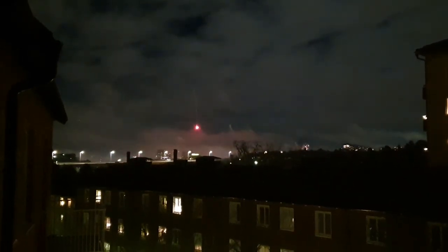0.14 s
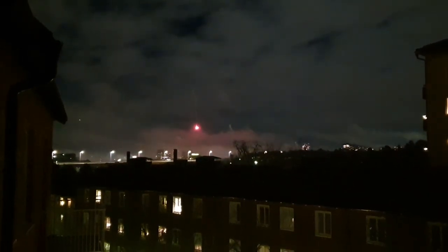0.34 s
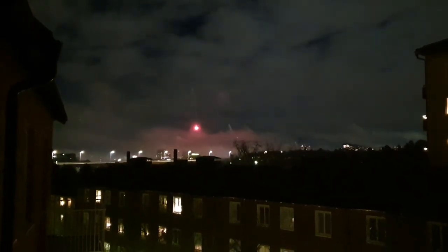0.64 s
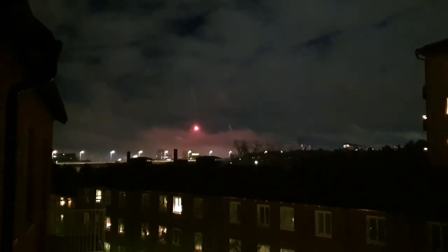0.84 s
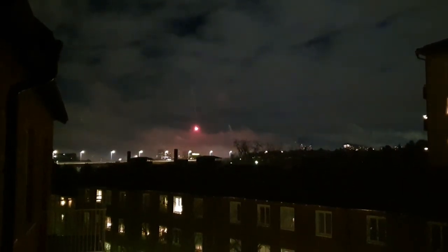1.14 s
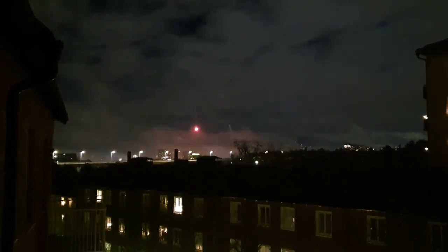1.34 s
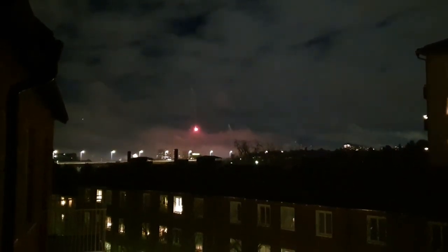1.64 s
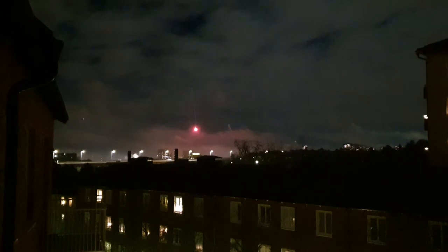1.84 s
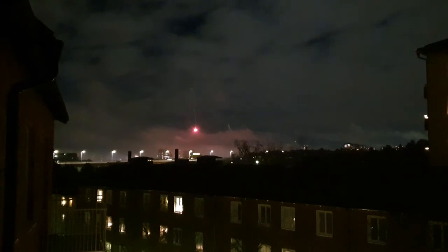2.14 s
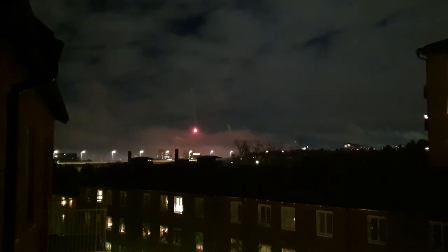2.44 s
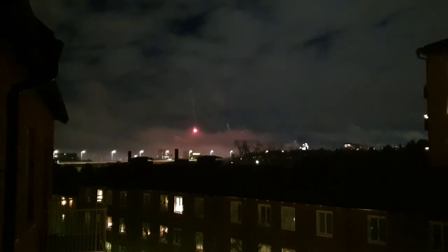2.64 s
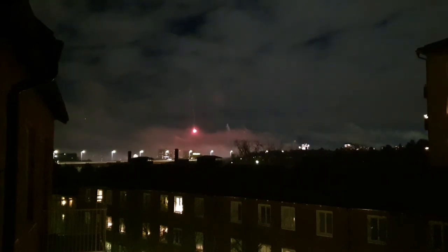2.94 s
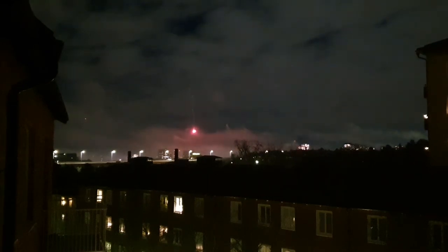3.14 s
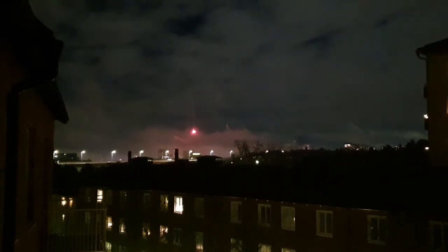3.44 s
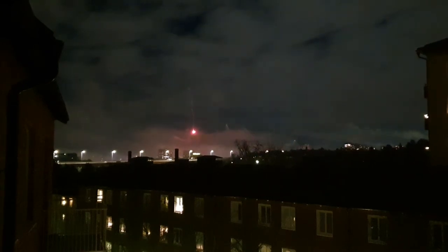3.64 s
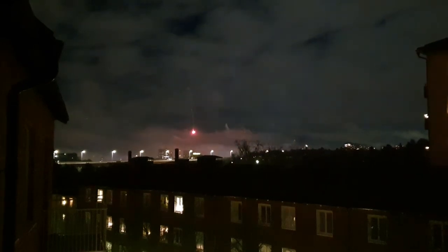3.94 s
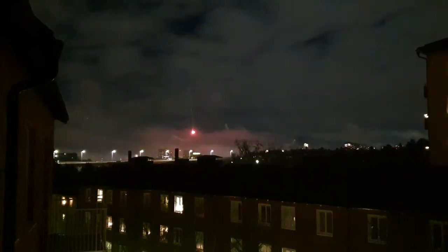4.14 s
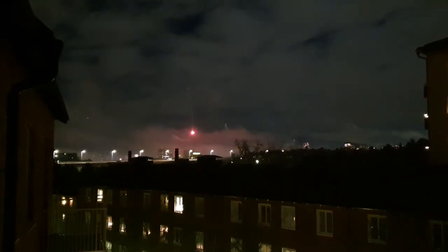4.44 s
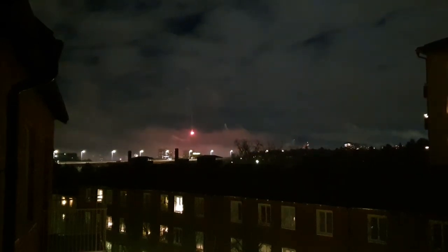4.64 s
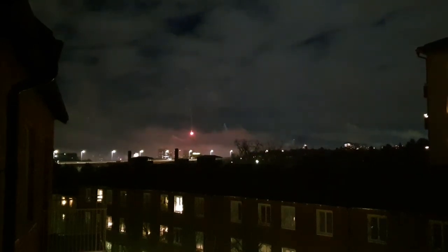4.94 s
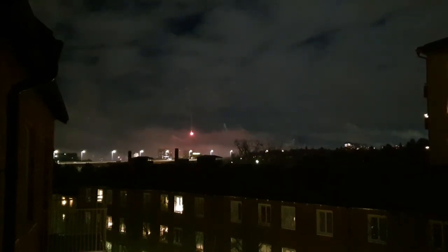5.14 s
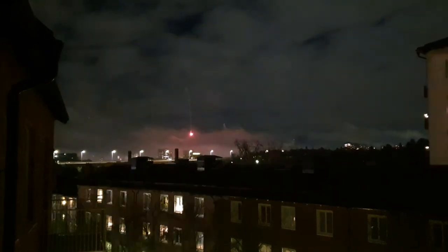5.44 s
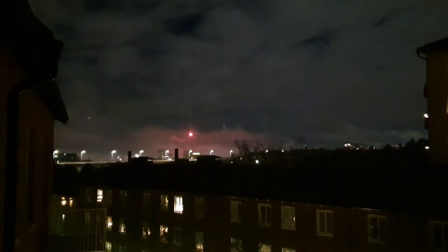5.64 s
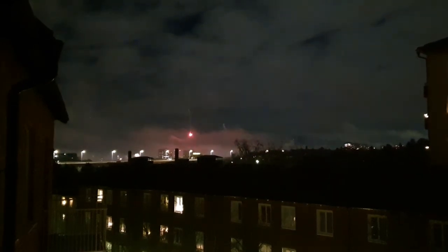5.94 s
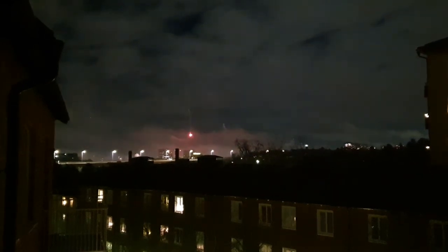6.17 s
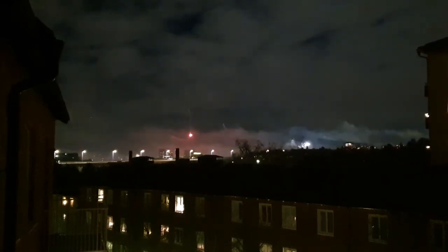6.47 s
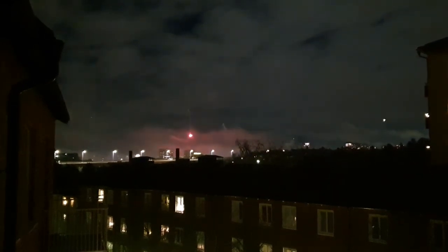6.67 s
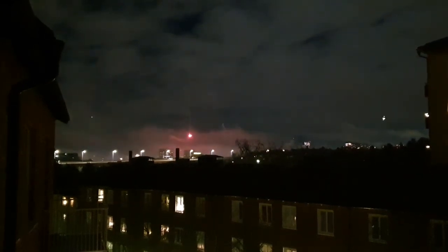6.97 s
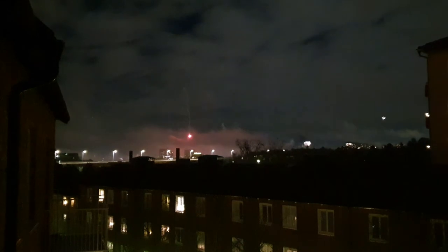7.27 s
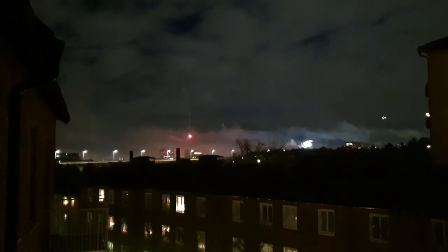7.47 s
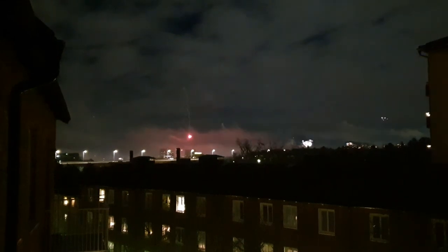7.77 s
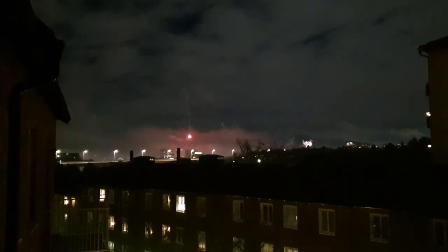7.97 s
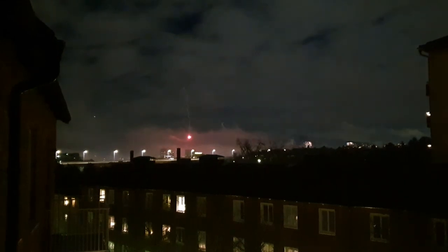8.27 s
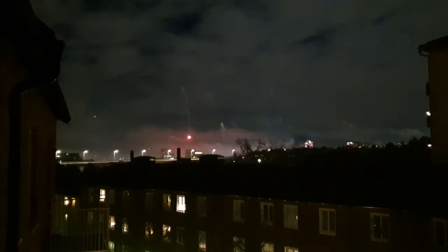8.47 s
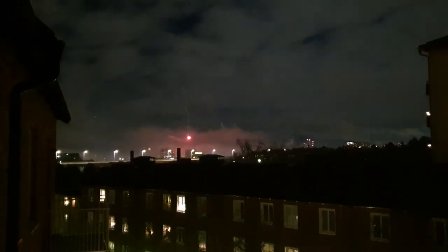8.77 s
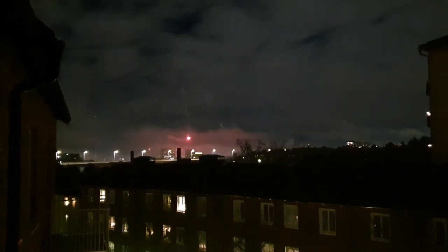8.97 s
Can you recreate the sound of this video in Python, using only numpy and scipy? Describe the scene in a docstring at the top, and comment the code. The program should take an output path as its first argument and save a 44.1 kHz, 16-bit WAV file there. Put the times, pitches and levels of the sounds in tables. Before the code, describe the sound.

Fireworks go off all over a town at night, heard in stereo from a balcony. Countless far pops merge into a low rumble, with dull single bangs arriving irregularly and bouncing off nearby walls. A nearer burst opens with a long, bright, crackling echo, and more follow. The two biggest rolls come in the second half, topped with sharp ticks, and a tight cluster of bangs lands at the end.

```python
"""Fireworks over a town at night, from a balcony, on a pair of microphones a hand apart.
From the start countless far pops merge into a rumble, and a near shell leaves a long bright roll between
the house fronts; for about a second the bass leans right. Single bangs keep arriving as dull pressure
pulses and come again off the walls nearby. The biggest rolls break near 6 s and 7.5 s, with ticks and
brief coloured echoes on top; a last tight cluster of bangs lands at 9 s."""
import sys
import numpy as np
from scipy import signal
from scipy.fft import rfft, irfft, next_fast_len
from scipy.io import wavfile
from scipy.ndimage import uniform_filter1d

SR = 44100
rng = np.random.default_rng(int(sys.argv[2]) if len(sys.argv) > 2 else 0)


def generate_wav(sig):
    """Save sig (samples, or channels by samples) to the path in sys.argv[1] as 16-bit PCM at SR."""
    pcm = np.round(np.clip(np.atleast_2d(sig).T, -1, 1) * 32767).astype(np.int16)
    wavfile.write(sys.argv[1], SR, pcm)


N = 401751
RIGHT_LAG_S = .0005  # sound from the far right reaches the left microphone this much later
SIDE_SCATTER_S = .0001  # typical lag of a report from nearly straight ahead
TOP_HZ = 15700  # upper edge of the sound


def bangs():
    """Each bang: blast pulse, what the air left of its sharp front, a thump off the house wall behind."""
    # bangs that stand out: t/s (mid-pulse), push/dB, pulse f/Hz, thump/dB, crack/dB, knock f/Hz
    reports = [(0.046, -10, 282, -23, -41, 900), (0.097, -11.5, 455, -16, -42, 2730),
               (0.571, -10.5, 558, -40, -46, 1270), (0.878, -17, 670, -38, -30.0, 1660),
               (1.133, -28, 390, -42, -40, 1950), (1.215, -12, 480, -43, -53.5, 900),
               (1.312, -13.5, 350, -37.5, -49, 2220), (1.351, -9, 511, -35, -32.5, 1800),
               (1.377, -10, 380, -41, -35.0, 2020), (1.409, -9, 358, -41, -32.5, 1190),
               (1.457, -6, 407, -12.5, -32, 1030), (1.616, -14, 314, -11, -59, 900),
               (1.782, -6.5, 466, -15.5, -36, 1190), (1.914, -23, 520, -26, -36, 1200),
               (2.005, -15, 450, -46, -34, 1110), (2.039, -12, 348, -28, -51, 1030),
               (2.076, -6.5, 487, -37, -41, 1340), (2.131, -18, 620, -45, -27.5, 1110),
               (2.143, -4, 423, -47, -28.5, 1460), (2.202, -5, 520, -34, -55, 4430),
               (2.219, -2.5, 394, -30, -25, 1790), (2.352, -9, 300, -43, -53, 900),
               (2.37, -12, 447, -37, -32, 1040), (2.482, -8.5, 434, -39, -46, 900),
               (2.51, -8.5, 370, -43, -53, 900), (2.57, -9, 450, -48, -42, 900),
               (2.765, -13.5, 378, -37, -29, 1110), (2.929, -8.5, 416, -46, -29.5, 1030),
               (2.944, -19, 420, -42, -44, 1100), (2.971, -5.5, 380, -9.5, -36.5, 1360),
               (3.088, -10, 328, -44.5, -39.5, 1260), (3.186, -6.5, 395, -36, -53, 950),
               (3.245, -20, 450, -36, -39.5, 2000), (3.443, -18.5, 600, -40, -42, 890),
               (3.586, -9, 424, -50, -63, 960), (3.637, -6, 420, -27, -37, 1600),
               (3.708, -9, 405, -25, -53, 1930), (3.762, -7, 469, -22, -30.5, 1480),
               (3.805, -16, 520, -18, -41.5, 1930), (3.825, -2, 430, -5.5, -32.5, 1100),
               (3.843, -22, 614, -46, -31, 1470), (3.932, -7.5, 520, -23, -60.5, 900),
               (4.026, -0.5, 350, -21.5, -26, 2090), (4.045, -28, 550, -41, -28.5, 1030),
               (4.123, -7, 375, -19.5, -35.5, 1185), (4.149, -5, 400, -38, -47, 1110),
               (4.188, -13.5, 360, -34, -31.5, 910), (4.259, -11, 440, -15, -35, 1110),
               (4.298, -7.5, 336, -24, -42, 2380), (4.338, -8.5, 394, -24, -37, 1670),
               (4.424, -10.5, 543, -19, -45, 960), (4.49, -11, 520, -42, -26.5, 1440),
               (4.516, -6.5, 422, -26, -44, 900), (4.591, -16, 676, -17.5, -32.5, 3130),
               (4.634, -1, 348, -44, -41.5, 1350), (4.724, -8.5, 362, -19, -25.5, 960),
               (4.775, -0.5, 355, -7.5, -39, 900), (4.908, -10, 328, -23, -30.5, 1130),
               (4.947, -6.5, 378, -33, -34, 1290), (5.116, -43, 430, -14, -55, 1110),
               (5.32, -33, 440, -15.5, -57, 960), (5.336, -6, 460, -18, -36.5, 1550),
               (5.424, -13, 470, -16, -33, 960), (5.481, -8, 457, -37, -28.5, 1640),
               (5.49, -4, 630, -14.5, -50, 1310), (5.553, -9.5, 500, -22, -34, 2730),
               (5.73, -5.5, 312, -7.5, -29, 1030), (5.753, -9, 540, -34, -34, 960),
               (5.802, -10.5, 456, -21, -51, 1036), (5.894, -5, 370, -5.5, -30.5, 1115),
               (5.923, -11, 466, -14, -31.5, 1910), (5.951, -3.5, 335, -5, -29, 965),
               (5.97, -10, 400, -31.0, -20.5, 1840), (5.978, -0.5, 626, -11.0, -22, 980),
               (6.035, -9, 328, -17, -31.5, 4500), (6.075, -9, 603, -19, -47, 960),
               (6.106, -6.5, 398, -16, -25.5, 900), (6.117, -18.5, 440, -17, -37, 1580),
               (6.147, -24, 420, -38, -29.5, 2070), (6.193, -10.5, 443, -21, -26, 1700),
               (6.319, -18, 340, -17, -41.5, 2240), (6.412, -0.5, 480, -15.5, -28, 2630),
               (6.434, -15, 398, -44, -33, 2940), (6.508, -7, 387, -32, -48, 1680),
               (6.595, -13, 338, -9, -56, 1190), (6.789, -25, 570, -16, -53.0, 960),
               (6.884, -8, 413, -35, -33.5, 1105), (7.055, -24.5, 447, -22.5, -38, 2530),
               (7.224, -11.5, 420, -31, -53, 1040), (7.263, -19, 472, -20, -36, 1670),
               (7.34, -7.5, 420, -36, -33, 1440), (7.467, -6, 414, -6, -32.5, 1020),
               (7.476, -7.5, 372, -13, -42, 3100), (7.491, -7.5, 270, -16, -49.0, 900),
               (7.523, -16, 380, -35, -32.0, 900), (7.529, -9, 262, -13, -40, 1810),
               (7.545, -3.5, 331, -4.0, -19.5, 2190), (7.553, -1.5, 640, -43, -20.5, 935),
               (7.614, -8, 395, -12, -32, 4430), (7.649, -7, 450, -14, -46, 900),
               (7.735, -14, 312, -21, -29.5, 1030), (7.771, -12.5, 510, -27, -44, 1680),
               (7.802, -8, 380, -31, -33, 1360), (7.904, -11.5, 365, -17, -34, 1190),
               (7.946, -11, 465, -18.5, -33, 2240), (8.01, -8.5, 463, -22, -31.5, 1850),
               (8.051, -4.5, 364, -8, -29, 1120), (8.094, -4.5, 467, -6, -26.5, 870),
               (8.212, -26.5, 520, -23, -34.5, 1380), (8.273, -2, 536, -10.5, -28.5, 2630),
               (8.362, -6.5, 338, -37, -46, 1030), (8.448, -12.5, 446, -24, -59, 1030),
               (8.677, -8, 343, -12.5, -34.5, 1110), (8.801, -13, 595, -43, -45, 960),
               (8.817, -7, 375, -33, -25, 960), (8.835, -9.5, 377, -45, -30.5, 1110),
               (8.934, -6, 453, -34, -40.5, 1710), (8.954, -17, 470, -27, -40.0, 1110),
               (8.981, -6.5, 390, -11, -29, 1030), (8.987, -21, 332, -33, -39, 3370),
               (9.054, -3, 446, -4.5, -20, 1240), (9.063, 2, 535, -12, -24.5, 2420),
               (9.067, -11, 460, -19, -22, 3160), (9.083, 1, 330, -12, -56, 1190)]
    # colour of the snap on reaching the balcony: f/Hz, gain/dB
    snap_colour = [(500, -16.5), (1200, 13.5), (2200, 3), (2900, -4.5), (3800, -2.5), (5200, -21.5),
                   (6800, -46), (15000, -56)]
    near_crack_db, onset_turns = -20.5, 0.096
    pulses, thumps, snaps, knocks = np.zeros((4, 2, N))
    t = np.arange(400) / SR
    splinters = rng.standard_normal((len(reports), 3, len(t)))
    scatter = rng.standard_normal(len(reports))
    for (s, db, hz, thump_db, crack_db, knock_hz), noise, side in zip(reports, splinters, scatter):
        start = s - .45 / hz
        lag_s = np.clip(side * SIDE_SCATTER_S, -RIGHT_LAG_S, RIGHT_LAG_S)
        lost_db = near_crack_db - crack_db  # weak cracks come from far: rounder onset, duller snap
        onset = onset_turns * 2 ** np.clip(lost_db / 14.5, 0, 2)
        add(pulses, undb(db) * blast(hz, damp=0.89, onset=onset), start, lag_s)
        add(thumps, undb(thump_db) * blast(hz=126.3, damp=1.0, onset=onset_turns), start + 0.0027, lag_s)
        # the front is a short knock of its own pitch inside a ragged snap
        knock_db = crack_db + 4 - 6.5 * np.log2(knock_hz / 1000)
        knock_shape = np.exp(-(t / 0.002 - 1) ** 2) * (1 - np.exp(-(t * knock_hz) ** 2))
        add(knocks, undb(knock_db) * knock_shape * np.sin(2 * np.pi * knock_hz * t), start, RIGHT_LAG_S)
        puff = undb(crack_db + 9) * np.exp(-t / 0.0016) * (1 - np.exp(-t / 0.00015))
        snap_top_hz = min(1.195 * knock_hz * 2 ** max(1 - lost_db / 11.5, 0), TOP_HZ)
        snap = butter(puff * (0.92 * noise[0] + noise[1:]), 6, snap_top_hz)
        i = int(start * SR)
        snaps[:, i:i + len(t)] += snap[:, :N - i]
    pulses, thumps = butter([pulses, thumps], 4, 1700)  # the air takes the treble
    return walls(pulses + knocks + colour(snaps, snap_colour)) + thumps


def blast(hz, damp, onset):
    """Push, pull and a fading rebound: a blast wave rounded by distance."""
    turns = np.arange(int(3 * SR / hz)) * hz / SR
    return np.sin(2 * np.pi * turns) * np.exp(-damp * turns ** 2) * (1 - np.exp(-turns / onset))


def ticks():
    """Short bright clicks on the loudest bangs, including the edge of microphone overload."""
    # one click in a band, nearly together at both microphones: t/s, peak level/dB, low f/Hz, top f/Hz
    clicks = [(2.197, -41, 3000, 7500), (4.028, -38.5, 1710, 4200), (4.032, -33, 1720, 4200),
              (4.591, -30, 2000, 4500), (5.969, -29, 1500, 4500), (5.979, -31, 1500, 5500),
              (6.147, -29, 1500, 4000), (6.411, -26, 2200, 5400), (6.412, -44.5, 5500, 14000),
              (7.552, -35, 1500, 5500), (7.918, -32, 1500, 4300), (7.946, -29, 1200, 4000),
              (8.274, -40, 1200, 5460), (8.989, -44, 1800, 5200), (9.068, -35, 2000, 5470),
              (9.067, -38, 6000, 14000)]
    out = np.zeros((2, N))
    for s, db, low_hz, top_hz in clicks:
        tick = butter(signal.unit_impulse(256), 5, [low_hz, top_hz], "band")
        add(out, undb(db) * tick / np.abs(tick).max(), s, SIDE_SCATTER_S)
    return out


def rolls():
    """Thousands of echoes off house fronts; the air eats the treble of the late, long paths first."""
    # near shells: t/s, level/dB, build-up/s, ring t60/s, treble/dB (4 kHz over 500 Hz)
    shells = [(0.01, -27, 0.0062, 2.87, 3.5), (0.884, -33, .007, 1.3, -11.5),
              (2.124, -30, 0.0064, 2.47, 4.5), (2.551, -41, 0.0062, 1.3, 3),
              (3.751, -28, .007, 0.88, -14.5), (4.468, -26.5, 0.012, 2.42, 1.5),
              (4.9, -27.5, 0.0092, 1.03, -9.5), (5.468, -30.5, 0.0069, 2.3, 3.5),
              (5.942, -21, 0.0072, 1.35, 3.5), (6.018, -37.5, .01, 2.87, 13.5),
              (6.41, -35, 0.0084, 0.64, 6.5), (6.999, -37.5, 0.0046, 0.43, -3),
              (7.517, -20.5, 0.0048, 1.6, 0), (7.581, -32, .012, 3.24, 9), (9.03, -33.5, 0.013, 1.4, 12.5)]
    # spectrum of a roll as picked up, with a microphone resonance near 9 kHz: f/Hz, level/dB per Hz
    roll_colour = [(35, -28), (70, -8.5), (170, -1.5), (420, -6.5), (700, -4.5), (1000, -13), (1700, -19),
                   (2600, -27), (3300, -29), (4200, -37.5), (5400, -45), (7000, -63.5), (8200, -65),
                   (9300, -57), (10500, -62), (12500, -63.5), (15500, -78.5)]
    # big house fronts that slap a shell's treble back: delay/s, lift/dB, width/s
    slaps = [(.03, 5, .006), (.09, 2, .014), (0.399, 7, 0.0033)]
    t, size = np.arange(0, N, 32) / SR, next_fast_len(N)
    hz = np.arange(size // 2 + 1) * SR / size
    echoes = pair(*[grains(2500, 3.) for _ in range(4)], split_hz=900) * lumps(50, 1.8)
    wash = pair(*rng.standard_normal((4, N)), split_hz=900)
    crackly, smooth = (rfft(colour(x, roll_colour), size) for x in (echoes, wash))
    slaps_db = []
    for s, *_, treble_db in shells:
        lift_db = sum(db * np.exp(-((t - s - delay) / width) ** 2) for delay, db, width in slaps)
        slaps_db.append(np.clip(treble_db / 6.5, 0, 1) * lift_db)  # only bright, near shells slap
    out, band_octaves = np.zeros((2, N)), 2 / 3
    for centre in 60 * 2 ** np.arange(0, 8.5, band_octaves):
        offset = np.log2(np.maximum(hz, 1) / centre) / band_octaves
        share = np.cos(np.pi / 2 * np.clip(offset, -1, 1)) ** 2
        height = np.log2(centre / 500) / 3
        power = np.zeros(len(t))
        for (s, db, build_s, t60, treble_db), slap_db in zip(shells, slaps_db):
            age = np.maximum(t - s, 0)
            ring_s = t60 / (1 + (centre / 7500) ** 2)
            tilt_db = treble_db * height + slap_db * np.clip(height, 0, 1)
            power += (undb(db + tilt_db - 60 * age / ring_s) * (1 - np.exp(-age / build_s))) ** 2
        fade = np.interp(np.arange(N) / SR, t, np.sqrt(power))
        # walls and roofs of different size return each band at its own moments; the top stays a wash
        spectrum, spread_db = (crackly, 2.8) if centre < 5000 else (smooth, 1.4)
        rms = np.sqrt(np.mean(np.abs(spectrum) ** 2) / N)
        band = irfft(spectrum * share, size)[:, :N] / rms
        out += fade * lumps(70, spread_db) * band
    return out


def flashes():
    """A house front returns one narrow band of a shell's crackle for a moment."""
    # coloured echoes that flash out of the rolls: t/s, centre f/Hz, level/dB
    echoes = [(0.089, 4500, -47), (.098, 2500, -47), (2.21, 9000, -67), (4.548, 9500, -70),
              (4.492, 3300, -49), (4.549, 4800, -53), (5.547, 3200, -41), (5.549, 4900, -56),
              (6.03, 11500, -65), (6.037, 5140, -54), (6.042, 3050, -39), (5.965, 10000, -66),
              (6.182, 4000, -52), (6.434, 2930, -35), (7.535, 10000, -68), (7.548, 12500, -61),
              (7.62, 3620, -45), (7.689, 1580, -35), (7.759, 4500, -57), (7.8, 9500, -70),
              (7.99, 9200, -73), (7.854, 5060, -55), (7.856, 9100, -68), (7.919, 3300, -48),
              (8.009, 2970, -41)]
    half_width_s, octaves = 0.005, 0.33
    out, t = np.zeros((2, N)), np.arange(-900, 900) / SR
    for (s, hz, db), noise in zip(echoes, rng.standard_normal((len(echoes), 3, len(t)))):
        edges_hz = hz * 2 ** (np.array([-.5, .5]) * octaves)
        crackle = butter(noise[0] + noise[1:], 2, edges_hz, "band")
        i = int((s + t[0]) * SR)
        out[:, i:i + len(t)] += level(crackle, db) * np.exp(-(t / half_width_s) ** 2)
    return out


def barrage():
    """Far over the roofs, pops of every size above their own merged rumble."""
    # course of the far barrage: t/s, level/dB, extra bass/dB
    course = [(0, -23.5, 2.5), (.38, -24.5, -1.5), (.71, -28.5, 0.5), (1.9, -28, 0), (2.79, -28.5, -2.5),
              (3.3, -27.5, 2), (3.88, -28, 3), (4.34, -28.5, 5), (4.8, -27, 0), (5.17, -29.5, 10),
              (5.6, -27.5, 3.5), (5.9, -28, 2), (6.06, -24, 0.5), (6.49, -25, 1), (6.9, -29, 1),
              (7.461, -26.5, 6.5), (7.66, -22.5, 1), (7.94, -24.5, 5.5), (8.1, -29, 4), (8.752, -29.5, 6.5),
              (9.11, -25.5, 8.5)]
    # its spectrum at this distance: f/Hz, level/dB per Hz
    far_colour = [(20, -61), (32, -15), (80, 0), (150, -6.5), (260, 0.5), (400, -1.5), (580, -5),
                  (700, -10), (900, -16), (1900, -32), (2900, -43.5), (4100, -52), (4700, -65.5),
                  (7000, -93)]
    pops = pair(*[grains(300, 2.7) for _ in range(4)], split_hz=1000)
    rumble = pair(*rng.standard_normal((4, N)), split_hz=633) * lumps(30, 1.5)
    far = level(colour(walls(undb(-11.5) * pops) + patchy(rumble), far_colour), 0)
    s, *columns_db = np.transpose(course)
    gain, bass_gain = (undb(np.interp(np.arange(N) / SR, s, db)) for db in columns_db)
    return (far + (bass_gain - 1) * below(far, hz=110)) * gain


def patchy(rumble):
    """Each range of the rumble swells on its own."""
    # borders between the ranges: f/Hz
    splits = (220, 600, 1300)
    out = 0
    for hz in splits:
        low = below(rumble, hz)
        out = out + low * lumps(30, 2.7)
        rumble = rumble - low
    return out + rumble * lumps(36, 1.3)


def walls(x):
    """Discrete echoes off the nearest walls, then a short, dull smear from the yard."""
    # walls around the balcony: delay/s, gain/dB, lag at the left microphone/s
    echoes = [(.0055, -7.5, -.0003), (.0094, -11, .0003), (.0116, -11, -.0003), (.0191, -17, .0004),
              (.0271, -23, -.0002)]
    out = x.copy()
    for s, db, lag_s in echoes:
        out += undb(db) * np.array([np.roll(x[0], int((s + lag_s) * SR)), np.roll(x[1], int(s * SR))])
    t, t60 = np.arange(int(.25 * SR)) / SR, 0.22
    mid, side = rng.standard_normal((2, len(t)))
    fade = undb(-60 * t / t60) * np.minimum(t / 0.0041, 1)
    smear = butter(np.array([mid + side, mid - 0.061 * side]) * fade, 2, 2550)
    return out + undb(-38.5) * signal.fftconvolve(x, smear, axes=1)[:, :N]


def pair(ahead, far_right, left_only, right_only, split_hz):
    """The microphones share long waves; short ones come from the far right or differ at the two."""
    diffuse = np.array([left_only, right_only])
    slanting = np.array([np.roll(far_right, int(RIGHT_LAG_S * SR)), far_right])
    long_waves = butter(ahead + 0.019 * diffuse, 2, split_hz)
    return long_waves + 0.94 * butter(.7 * slanting + diffuse, 2, split_hz, "high")


def grains(rate, spread_db):
    """Dense signed clicks of uneven size, rms 1; the largest are held in."""
    size = rng.standard_normal(N) * undb(spread_db * np.minimum(rng.exponential(size=N), 2.5))
    return level((rng.random(N) < rate / SR) * np.clip(size, -4, 4), 0)


def lumps(rate, spread_db):
    """Gain that jumps as groups of echoes arrive and sags between them."""
    hits = (rng.random(N) < rate / SR) * rng.exponential(size=N)
    sag = np.exp(-rate / SR)
    swell = signal.lfilter([1], [1, -sag], uniform_filter1d(hits, size=60))
    return undb(spread_db * np.minimum((swell - swell.mean()) / swell.std(), 2))


def undb(db):
    """Gain of a level in dB."""
    return 10 ** (np.asarray(db) / 20)


def level(x, db):
    """Scale to an rms level."""
    return x * undb(db) / np.sqrt(np.mean(x ** 2))


def butter(x, order, hz, kind="low"):
    """Causal low-, high- or band-pass."""
    return signal.sosfilt(signal.butter(order, hz, kind, fs=SR, output="sos"), x)


def below(x, hz):
    """The part below hz, without phase shift."""
    return signal.sosfiltfilt(signal.butter(2, hz, fs=SR, output="sos"), x)


def colour(x, points):
    """Causal filter through (f/Hz, gain/dB) points, from the cepstrum of its log gain."""
    size = 4096
    hz = np.arange(size // 2 + 1) * SR / size
    at_hz, db = np.transpose(points)
    curve_db = np.interp(np.log(np.maximum(hz, 1)), np.log(at_hz), db)
    cepstrum = irfft(np.log(undb(curve_db)))
    cepstrum[1:size // 2] *= 2
    cepstrum[size // 2 + 1:] = 0
    response = irfft(np.exp(rfft(cepstrum)))
    return signal.fftconvolve(x, np.atleast_2d(response), axes=1)[:, :N]


def add(out, sound, s, lag_s):
    """Mix a short sound into both channels, the left lagging by lag_s."""
    for ch, late in enumerate((lag_s, 0)):
        i = int((s + late) * SR)
        piece = sound[:max(N - i, 0)]
        out[ch, i:i + len(piece)] += piece


def scene():
    """Bangs in the yard, rolls and barrage over the roofs."""
    return bangs() + ticks() + rolls() + flashes() + barrage()


def record(dry):
    """The microphones drop the deep bass and differ in tone; faint hiss, clipping, a cut at the top."""
    # microphone hiss: f/Hz, level/dB per Hz
    hiss_colour = [(20, -9.5), (6000, -3.5), (8000, -5), (12000, -1), (15000, -8)]
    # the left microphone hears more middle and less treble: f/Hz, left over right/dB
    balance = [(60, -0.96), (250, 1.5), (500, 2.5), (1500, 1.55), (4000, 1.7), (8000, -13), (12000, -5)]
    mid, side = rng.standard_normal((2, N))
    hiss = level(colour(np.array([mid + .5 * side, mid - .5 * side]), hiss_colour), -88)
    mics = butter(butter(dry, 4, 52, "high"), 2, 34, "high")
    # until 1.18 s the bass leans to the right
    lean = 0.75 * np.clip((1.18 - np.arange(N) / SR) / .02, 0, 1)
    mics = mics + lean * below(mics.mean(axis=0), hz=300) * [[-1], [1]]
    left = colour(mics[:1], [(hz, db / 2) for hz, db in balance])
    right = colour(mics[1:], [(hz, -db / 2) for hz, db in balance])
    clipped = np.clip(np.vstack([left, right]) + hiss, -1, 1)
    return signal.sosfilt(signal.ellip(8, .2, 70, TOP_HZ, fs=SR, output="sos"), clipped)


dry = scene()
out = record(dry)
generate_wav(out)
```